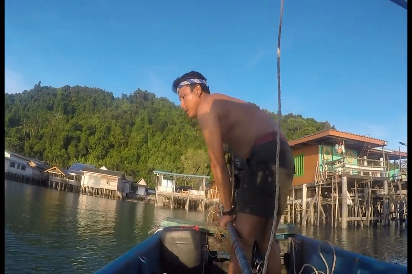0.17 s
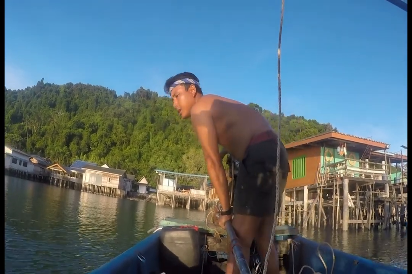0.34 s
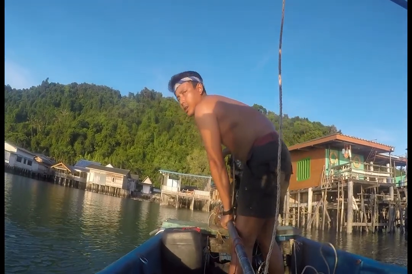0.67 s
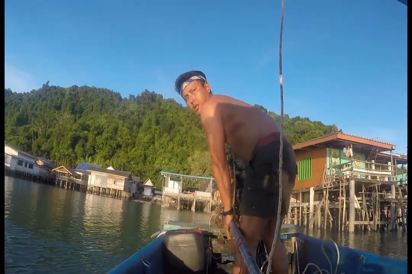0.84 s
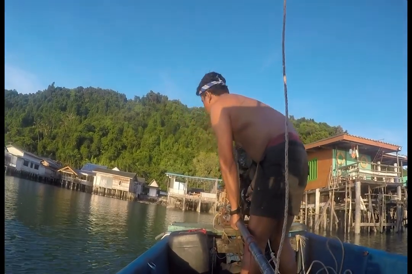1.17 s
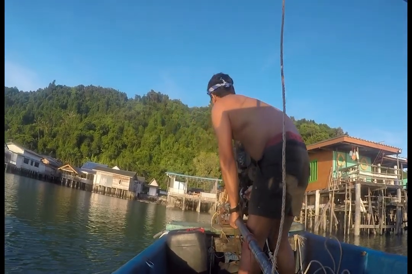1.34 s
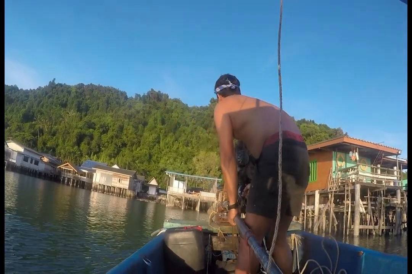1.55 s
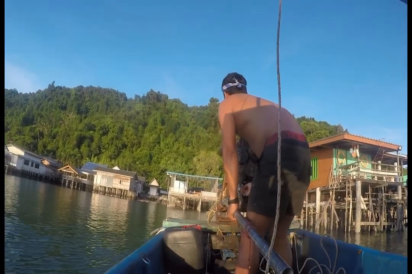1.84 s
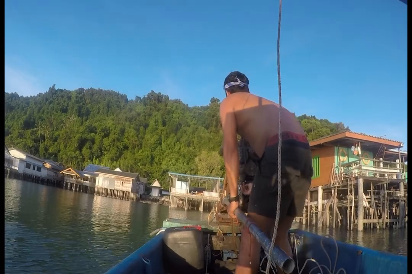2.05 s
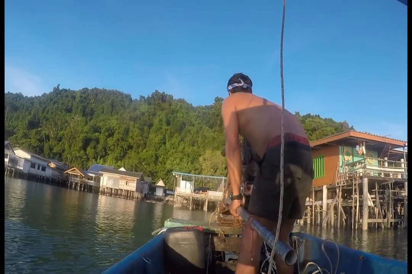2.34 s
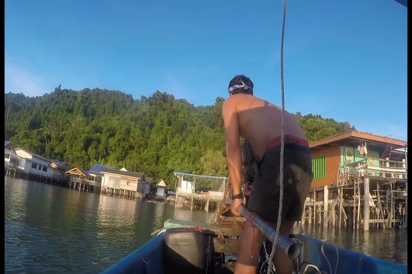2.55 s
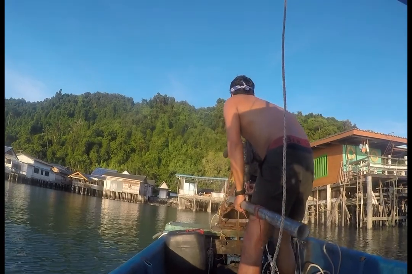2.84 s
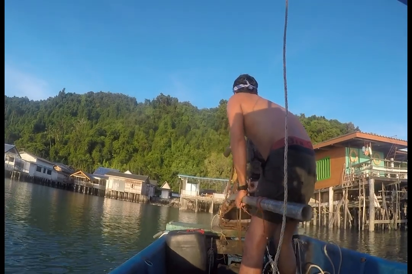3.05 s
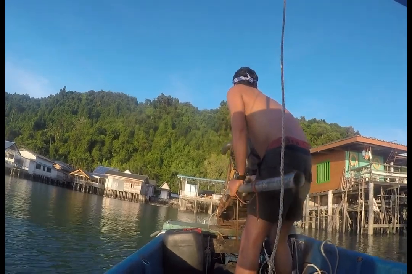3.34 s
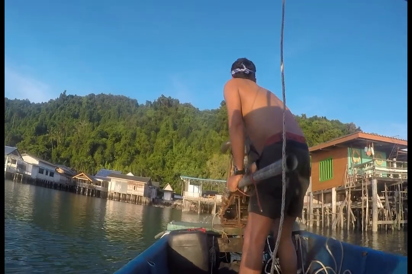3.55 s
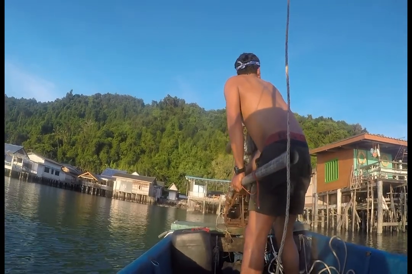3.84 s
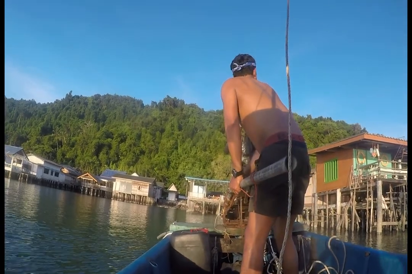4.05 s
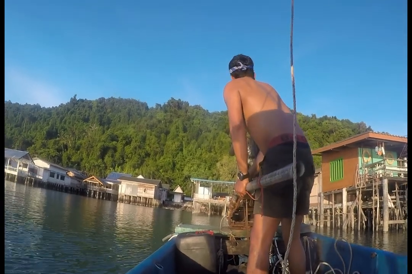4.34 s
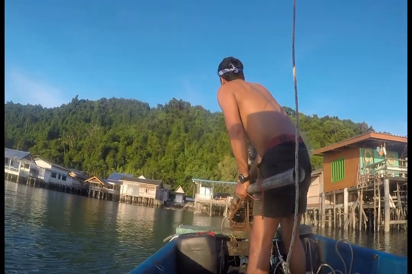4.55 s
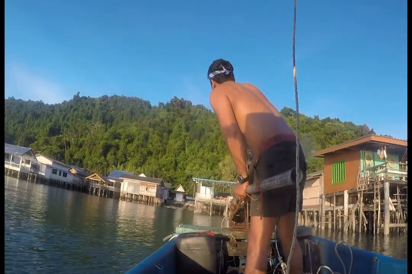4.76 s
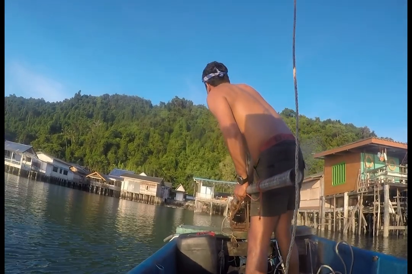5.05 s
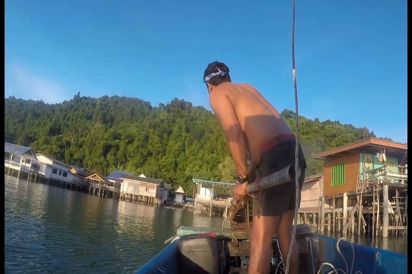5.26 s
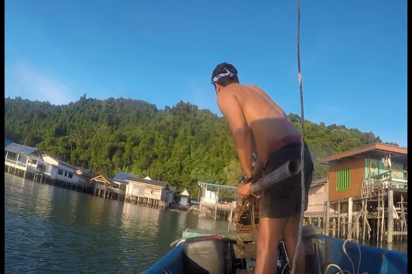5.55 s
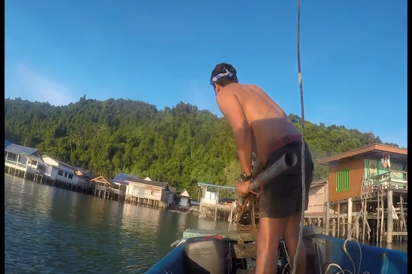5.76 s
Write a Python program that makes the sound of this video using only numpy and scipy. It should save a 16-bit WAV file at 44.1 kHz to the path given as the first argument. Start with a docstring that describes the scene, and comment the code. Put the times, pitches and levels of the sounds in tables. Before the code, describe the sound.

Close, dry sound aboard a small wooden boat in the open air. For the first 1.4 seconds someone shifts their feet: a run of dull, low thuds on the planks with short grainy scuffs and a couple of small clacks, over very faint air hiss. It goes almost quiet until 2.0, when a sharp clack and heavy thump land together and the starter engages. Its gritty gear whine strains in about six surges, each sagging in pitch, getting closer together, with another low thump near 2.4. Around 3.0 to 3.2 the engine catches in a crackle of hard knocks and a deep jolt. It drops into a lumpy, clattering idle, with exhaust puffs, ticks and loose metallic clacks, strongest around 3.5. From about 4 seconds it speeds up, roughly doubling its pace by 5.9, growing louder and brighter with a rising boom and fan hiss. A solid thud falls near 5.3.

```python
"""Aboard a longtail boat on calm water: feet thud and scuff on the wooden hull, sharp clacks sound. The
starter, a whine in gear noise, labours through six compressions; shaped noise bursts are the catch. The engine
settles to a clattering idle that speeds up and grows louder: noise pulsed at each firing, exhaust puffs, ticks
and a boom. Low noise is the hull's rumble, hiss the open air."""
import sys
import numpy as np
from scipy import signal
from scipy.fft import rfft, irfft
from scipy.io import wavfile
from scipy.ndimage import uniform_filter1d

SR = 44100
rng = np.random.default_rng(int(sys.argv[2]) if len(sys.argv) > 2 else 0)


def bounce(signal):
    """Save signal as a 16-bit WAV file at the path given by the first command-line argument."""
    frames = np.transpose(np.atleast_2d(signal))
    limited = np.clip(frames, -1, 1)
    pcm = np.round(limited * 32767).astype(np.int16)
    wavfile.write(sys.argv[1], SR, pcm)


N = 260322
TIME, FREQS = np.arange(N) / SR, np.fft.rfftfreq(N, 1 / SR)
EDGE_HZ = 15350

# Spectra below: (frequency [Hz], relative density [dB]).
# open air
AIR_SPECTRUM = [(35, -25), (60, -1), (246, -7), (390, -11), (727, -12.5), (1420, -14), (2200, -14),
                (2530, -17), (2710, -8), (3190, -14.5), (3580, -15), (3840, -15), (4310, -17.5),
                (6530, -22.5), (15000, -30.5)]
AIR_DB = -59.5
# hull rumble
RUMBLE_SPECTRUM = [(12, 6.5), (27, -1), (43, 1.5), (55, -4.5), (90, -17.5), (130, -16.5), (180, -33.5)]
# hull rumble: at rest, under starter load, at idle (less as the engine speeds up)
CALM_DB, CRANK_SHAKE_DB, IDLE_SHAKE_DB, SHAKE_DB_PER_OCTAVE = -53, -28, -21, -5.5
FOOTWORK_DB, FOOTWORK_END_S = -44.5, 1.4  # the boat sways while someone shifts about
JOLT_S, JOLT_DB = 3.1, -18.5  # the kick as the engine catches
THUD_ROCK_DB, ROCK_RISE_S, ROCK_DECAY_S = -11.5, 0.018, 0.18  # rocking, relative to each blow

# scuffs and scrapes: (middle [s], nominal length [s], level [dB], tilt [dB per octave])
SCUFFS = [(0.1, 0.032, -57, 6), (0.358, 0.12, -51, 4), (0.484, 0.038, -49.5, 9), (0.642, 0.052, -52, 1),
          (0.839, 0.045, -49, 1), (0.934, 0.029, -51, 1), (1.255, 0.11, -52.5, 4), (2.086, 0.026, -33.5, 8)]
# rubbing on the hull
SCUFF_SPECTRUM = [(200, 6), (600, 14), (1200, 10.5), (2200, 4.5), (3000, 9), (4500, -6), (7000, -14),
                  (10000, -34), (15000, -37)]

# dull blows on the hull:
# (time [s], level [dB], nominal boom frequency [Hz], t60 [s], slap relative to boom [dB])
THUDS = [(0.162, -38.5, 93, 0.3, -3.5), (0.207, -30.5, 108.6, 0.14, -9), (0.354, -28.5, 42.9, 0.38, -24.5),
         (0.548, -49, 162, 1, -18.5), (.632, -28, 43.3, 0.19, -8), (.764, -26, 89, 0.021, -15.5),
         (.826, -25.5, 47.7, 0.092, -27.5), (0.872, -21, 92, 0.071, -10), (.967, -28, 81, 0.034, -11.5),
         (1.028, -28.5, 88, 0.16, -9), (1.092, -35.5, 108, 0.24, -10), (1.166, -38, 112, 0.14, -28),
         (1.313, -26.5, 57, 0.06, -23), (2.003, -31, 84.4, 0.57, -14), (2.069, -14.5, 85.5, 0.076, -13),
         (2.147, -19, 53.6, 0.11, -12), (2.376, -17, 92, 0.093, -32), (5.26, -13.5, 62.7, 0.15, -17)]
# plank modes: (frequency [Hz], relative level [dB], t60 [s])
SLAP_MODES = [(192, 4, 0.017), (364, 1, 0.023), (487, -4, 0.029), (656, -3.5, 0.029), (1040, -4, 0.012)]

# sharp clacks: (time [s], peak [dB], brightness [dB per octave])
CLACKS = [(.204, -21.5, -4), (.871, -23, 10), (2.0597, -7.5, 1), (3.012, -17, -2), (3.4802, -10, 8.5),
          (3.614, -22.5, 9), (3.688, -30, -6), (3.762, -25, -5), (3.885, -20.5, -4), (3.958, -19, -1),
          (4.32, -15.5, -2), (4.62, -18.5, -2), (5.325, -18, -3.5)]
# its modes: (nominal frequency [Hz], relative level [dB], t60 [s])
CLACK_MODES = [(464, -19, 0.048), (632, -12.5, 0.025), (1120, 11.5, 0.006), (1693, -6, 0.023),
               (2530, 4, 0.006), (3750, -13, 0.0077), (5230, -22.5, 0.0052)]

# compressions loading the starter: (start [s], length [s], gear noise [dB], share of speed lost [1])
COMPRESSIONS = [(2.078, .155, -41, 0.34), (2.333, 0.12, -36, 0.42), (2.577, 0.068, -35, .42),
                (2.769, 0.097, -35.5, 0.48), (2.953, .09, -38, .36), (3.082, 0.12, -34.5, 0.06)]
LOAD_RISE_S, LOAD_RELEASE_S, RECOVER_S = 0.021, 0.038, .06
ENGAGE_S, RELEASE_S, COAST_DB = 2.07, 3.3, -59  # pinion in mesh between; gear noise without load
MESH_HZ, SPIN_UP_SHARE, SPIN_UP_S = 1694, .48, .14  # free tooth rate, share missing at first, time constant
# starter gears
GEARS_SPECTRUM = [(250, -31), (650, -15), (950, -11), (1250, -12), (1450, -19), (1700, -4), (2000, -13),
                  (2900, 5), (3500, -3.5), (5600, -10.5), (6400, -17.5), (9000, -28), (13000, -30),
                  (15000, -46)]
# starter motor hiss
SPIN_SPECTRUM = [(300, -7.5), (1000, -4.5), (2000, -16), (3000, 4), (5400, -5), (7500, -12.5), (8800, -27),
                 (10300, -21), (15000, -33)]

# the engine lurches on its mounts under compressions: (time [s], level [dB])
LURCHES = [(2.142, -26.5), (2.161, -33.5), (2.226, -34), (2.372, -29), (2.401, -32), (3.03, -31.5)]
# clunking mounts
MOUNTS_SPECTRUM = [(110, 7), (170, 10.5), (260, -18.5), (480, 0), (850, 0.5), (1300, -10), (1800, -14.5),
                   (2600, -22)]
LURCH_RISE_S, LURCH_DECAY_S = 0.0016, 0.013

# engine speed: (time [s], firing rate [1/s])
SPEED = [(3.1, 20.88), (3.4, 18.95), (3.55, 22.15), (3.8, 18.6), (4.05, 21.86), (4.25, 24.68),
         (4.45, 27.86), (4.6, 26.6), (4.8, 30.32), (5.1, 31.99), (5.35, 34.17), (5.6, 34.66), (5.9, 39.98)]
FIRST_FIRING_S, IDLE_FIRINGS_PER_S = 3.121, 20
# strength of each cylinder in firing order: (relative level [dB])
CYLINDERS_DB = [-0.9, -1.3, -2.5, 1.1, -2.5, -4]
# engine block
BLOCK_SPECTRUM = [(150, -30.5), (250, -7.5), (500, -5.5), (800, -6), (1200, -6), (1480, -14.5),
                  (1800, -6.5), (2100, -9.5), (2500, -7.5), (3100, -6.5), (4200, -13.5), (5500, -16),
                  (8500, -33.5), (15000, -34.5)]
# ringing block and covers: (frequency [Hz], width [Hz], level above the spectrum [dB])
BLOCK_MODES = [(334.4, 25, 12), (904, 72, 9.5), (1085, 33, 14), (1273, 84, 12), (1697, 210, 12),
               (2765, 128, 18), (2940, 68, 14), (3580, 126, 12.5), (3865, 115, 12.5), (4700, 30, 4.5),
               (6060, 26, 10), (6820, 72, 9), (7670, 760, 13), (10170, 890, 11.5)]
# loose parts chattering at each firing:
# (frequency [Hz], width [Hz], relative level [dB], place in firing cycle [cycles])
RATTLES = [(1176, 440, -15.5, 0.153), (1737, 380, -14.5, -0.019), (2616, 460, -10, -0.12),
           (2920, 490, -10.5, -0.24), (5120, 1330, -20.5, -0.38)]
# engine tick
TICK_SPECTRUM = [(2000, -20), (5000, 12), (7500, 6.5), (9000, 1), (10300, 3.5), (12000, 5), (13300, 3),
                 (15000, -15)]
# exhaust; also the starter motor's low noise
EXHAUST_SPECTRUM = [(40, -25.5), (70, 3), (100, -5), (140, 1.5), (180, -4.5), (220, -15), (300, -29.5),
                    (600, -47.5)]
# levels at the idle rate, and gain per doubling of speed
CLATTER_DB, CLATTER_DB_PER_OCTAVE = -41, 6
EXHAUST_DB, EXHAUST_DB_PER_OCTAVE = -36, 0
FLARE_DB, FLARE_END_S, FLARE_FADE_S = 5, 3.21, .06  # exhaust is louder while the engine catches

# firings that knock harder than the rest: (time [s], level [dB])
HARD_FIRINGS = [(2.965, -26), (3.033, -30), (3.058, -28.5), (3.108, -24.5), (3.124, -30), (3.143, -23.5),
                (3.165, -23), (3.207, -21), (3.364, -28.5), (3.414, -32.5), (3.554, -35.5), (4.184, -29),
                (4.383, -34), (4.942, -27)]
# hard knock
KNOCK_SPECTRUM = [(200, -5.5), (550, -1.5), (1150, -1.5), (1500, -4.5), (1800, 2.5), (2100, -8.5),
                  (2600, 5.5), (3150, -1), (3800, -2.5), (5500, -8.5), (8500, -22.5), (15000, -23)]
KNOCK_RISE_S, KNOCK_DECAY_S = 0.0017, 0.015

# cooling fan
FAN_SPECTRUM = [(800, -6), (2500, 0.5), (4000, 1), (5700, 2), (7300, -12), (9000, -18.5), (15000, -17)]


def amp(db):
    """Decibels to gain."""
    return 10 ** (np.asarray(db) / 20)


def unit(x):
    """Scales to rms 1."""
    return x / np.sqrt(np.mean(x ** 2) + 1e-20)


def curve(rows):
    """Points (time [s], value) joined by straight lines."""
    rows = np.asarray(rows)
    return np.interp(TIME, rows[:, 0], rows[:, 1])


def add(mix, s, sound):
    """Mixes a sound in at a time."""
    part = mix[max(round(s * SR), 0):][:len(sound)]
    part += sound[:len(part)]


def colour(x, points, modes=()):
    """Causal (minimum-phase) filter: a smooth spectrum with steep ends, resonances standing on it."""
    hz, db = np.transpose(points)
    octave = np.log2(FREQS + 1)
    level = np.interp(octave, np.log2(hz + 1), db)
    level -= 18 * np.maximum(np.log2(hz[0] + 1) - octave, 0)
    level -= 18 * np.maximum(octave - np.log2(hz[-1]), 0)
    power = 1 + sum((amp(d) ** 2 - 1) / (1 + (2 * (FREQS - f) / w) ** 2) ** 2 for f, w, d in modes)
    log_gain = np.log(np.maximum(amp(level) * np.sqrt(np.abs(power)), 1e-5))
    fold = np.r_[1, np.full(N // 2 - 1, 2), np.zeros(N - N // 2)]
    causal = irfft(log_gain, N) * fold
    return irfft(rfft(x) * np.exp(rfft(causal)), N)


def noise():
    """White noise of rms 1."""
    return rng.standard_normal(N)


def drift(hz):
    """Slow chance of rms 1, up to the given rate."""
    return unit(irfft(rfft(noise()) / (1 + (FREQS / hz) ** 4), N))


def bursts(rows, rise_s, decay_s):
    """Envelope of blows (time [s], level [dB], ...) sharing one rise and one decay."""
    out = np.zeros(N)
    for s, db, *_ in rows:
        age_s = np.maximum(TIME - s, 0)
        out += amp(db) * np.exp(-age_s / decay_s) * (1 - np.exp(-age_s / rise_s))
    return out


def blows(cycles, place, rate, decay_s, cylinders_db, spread_db, rise_s=0.0011):
    """Envelope of one blow a cycle at the given place in the cycle, each of its own strength."""
    number = np.floor(cycles - place).astype(int)
    age_s = (cycles - place - number) / rate
    chance_db = spread_db * rng.standard_normal(size=256)[number % 256]
    db = np.asarray(cylinders_db)[number % len(cylinders_db)] + chance_db
    return amp(db) * np.exp(-age_s / decay_s) * (1 - np.exp(-age_s / rise_s))


def with_speed(idle_db, db_per_octave):
    """Gain that follows the engine's speed."""
    return amp(idle_db + db_per_octave * np.log2(curve(SPEED) / IDLE_FIRINGS_PER_S))


def load(start_s, length_s):
    """One compression bears on the starter: it rises, holds and lets go."""
    release = np.exp(-np.maximum(TIME - start_s - length_s, 0) / LOAD_RELEASE_S)
    return np.clip((TIME - start_s) / LOAD_RISE_S, 0, 1) * release


def surroundings():
    """Faint open-air hiss, and the deep rumble of the moving hull."""
    air = amp(AIR_DB) * unit(colour(noise(), AIR_SPECTRUM, [(3100, 220, 4.6)]))
    return air + shake() * unit(colour(noise(), RUMBLE_SPECTRUM))


def shake():
    """Hull motion: footwork, blows, compressions, the catch and the running engine add their power."""
    footwork = amp(FOOTWORK_DB) * np.clip((FOOTWORK_END_S - TIME) / ROCK_DECAY_S, 0, 1)
    knocked = [amp(THUD_ROCK_DB) * bursts([row], ROCK_RISE_S, ROCK_DECAY_S) for row in THUDS]
    cranking = amp(CRANK_SHAKE_DB) * sum(load(start, length) for start, length, *_ in COMPRESSIONS)
    jolt = bursts([(JOLT_S, JOLT_DB)], ROCK_RISE_S, ROCK_DECAY_S)
    onset = np.clip((TIME - JOLT_S) / ROCK_RISE_S, 0, 1)
    running = with_speed(IDLE_SHAKE_DB, SHAKE_DB_PER_OCTAVE) * onset
    parts = [amp(CALM_DB), footwork, cranking, jolt, running, *knocked]
    return np.sqrt(sum(part ** 2 for part in parts))


def scuffs():
    """Short grainy rubs that swell and fade."""
    out = np.zeros(N)
    rub = rfft(colour(noise() * amp(1.6 * drift(600)), SCUFF_SPECTRUM))
    for s, length, db, tilt_db in SCUFFS:
        # the whole swell spans 1.42 nominal lengths
        swell = np.cos(np.pi * np.clip((TIME - s) / (length * 1.42), -.5, .5)) ** 2
        tilted = unit(irfft(rub * amp(tilt_db * np.log2(FREQS + 1)), N))
        out += amp(db) * swell * tilted
    return out


def thuds():
    """Blows on the planks: a low boom that starts high and sinks, and a brief woody slap."""
    out, t = np.zeros(N), np.arange(SR // 3) / SR
    attack = 1 - np.exp(-t / .0012)
    slap = sum(amp(db - 60 * t / t60) * np.sin(2 * np.pi * hz * t) for hz, db, t60 in SLAP_MODES)
    for s, db, hz, t60, slap_db in THUDS:
        # glides from 1.32 to 0.85 times nominal
        turns = np.cumsum(hz * (.85 + 0.47 * np.exp(-t / 0.0202))) / SR
        boom = amp(-60 * t / t60) * np.sin(2 * np.pi * turns)
        add(out, s, amp(db) * attack * (boom + amp(slap_db) * slap))
    return out


def clacks():
    """A sharp clack: a few short modes, the upper ones stronger on a sharp blow."""
    out, t = np.zeros(N), np.arange(SR // 16) / SR
    detunes = rng.standard_normal((len(CLACKS), len(CLACK_MODES)))
    for (s, db, bright_db), detune in zip(CLACKS, detunes):
        ring = np.zeros(len(t))
        for k, ((hz, mode_db, t60), e) in enumerate(zip(CLACK_MODES, detune)):
            decay = amp(mode_db + bright_db * np.log2(hz / 1200) - 60 * t / t60)
            ring += (-1) ** k * decay * np.sin(2 * np.pi * hz * (1 + .03 * e) * t)
        ring *= 1 - np.exp(-t / 0.00062)
        add(out, s, amp(db) * ring / np.abs(ring).max())
    return out


def mesh_hz():
    """The starter spins up; each compression drags it down ever harder, then it recovers."""
    hz = MESH_HZ * (1 - SPIN_UP_SHARE * np.exp(-np.maximum(TIME - ENGAGE_S, 0) / SPIN_UP_S))
    for start, length, _, sag in COMPRESSIONS:
        recovery = np.exp(-np.maximum(TIME - start - length, 0) / RECOVER_S)
        drag = np.clip((TIME - start) / length, 0, 1) ** 2 * recovery
        hz = hz * (1 - sag * drag)
    return hz


def starter():
    """Pinion teeth grind on the flywheel: broken whine in gear noise via the housing, over motor hiss."""
    turns = np.cumsum(mesh_hz() * (1 + .026 * drift(150))) / SR
    # uneven teeth: side partials, each fluttering; (multiple of mesh rate, dB)
    partials = [(1, 0), (.75, -5), (1.25, -7), (2, -12), (3, -13)]
    whine = unit(sum(amp(db + 3 * drift(60)) * np.sin(2 * np.pi * k * turns) for k, db in partials))
    grind = unit(noise() * amp(2 * drift(150)))
    # (Hz, width Hz, dB above the spectrum)
    housing = [(924, 105, 11.8), (1257, 82, 12.2), (1750, 98, 3.3), (2930, 105, 6.2)]
    gears = unit(colour(grind + .45 * whine, GEARS_SPECTRUM, housing))
    engaged = (TIME > ENGAGE_S) & (TIME < RELEASE_S)
    strain = amp(COAST_DB) + sum(amp(db) * load(start, length) for start, length, db, _ in COMPRESSIONS)
    powered = np.interp(TIME, [2.07, 2.1, 3.1, 3.25], [0, 1, 1, 0])
    motor = amp(-46.5) * unit(colour(noise(), SPIN_SPECTRUM))
    motor += amp(-50.5) * unit(colour(noise(), EXHAUST_SPECTRUM))
    return gears * strain * engaged + motor * powered


def lurches():
    """Rattling clunks from the mounts: short bursts of shaped noise."""
    return bursts(LURCHES, LURCH_RISE_S, LURCH_DECAY_S) * unit(colour(noise(), MOUNTS_SPECTRUM))


def block_and_chatter(firings, rate):
    """Combustion and piston slap drive the block; loose parts chatter at each firing."""
    combustion = blows(firings, -.22, rate, .009, CYLINDERS_DB, 2, rise_s=.003)
    piston_slap = blows(firings, .09, rate, .0012, CYLINDERS_DB, 3.5, rise_s=.0004)
    drive = unit(.66 + 1.1 * combustion + .9 * piston_slap) * unit(noise() * amp(2.2 * drift(500)))
    # the block rings on more as the blows come faster
    ringing = np.clip((rate - 13) / 20, 0, 1)
    block = ringing * unit(colour(drive, BLOCK_SPECTRUM, BLOCK_MODES))
    block += (1 - ringing) * unit(colour(drive, BLOCK_SPECTRUM))
    chatter = np.zeros(N)
    for hz, width, db, place in RATTLES:
        ring = unit(irfft(rfft(noise()) / (1 + (2 * (FREQS - hz) / width) ** 4), N))
        hits = blows(firings, place, rate, .007, CYLINDERS_DB, 4, rise_s=.0015)
        chatter += amp(db) * unit(ring * hits)
    return with_speed(CLATTER_DB, CLATTER_DB_PER_OCTAVE) * (block + chatter)


def ticking(firings, rate):
    """A tick twice a crank turn (every 1.5 firings): pulsed noise and a wavering high tone."""
    tick = blows(firings * 2 / 3, .03, rate * 2 / 3, .012, [0, 0], 2.2, rise_s=.005)
    ticks = amp(-57.0) * unit(colour(noise() * (tick + 0.25), TICK_SPECTRUM))
    return ticks + amp(-66) * unit(tick * np.sin(2 * np.pi * 12555 * TIME + 1.8 * drift(70)))


def exhaust_gas(firings, rate):
    """A pressure pulse a firing with turbulent gas around it."""
    puffs = unit(blows(firings, -.1, rate, .004, CYLINDERS_DB, 1.5))
    gas = unit(colour(noise() * (1 + .3 * puffs), EXHAUST_SPECTRUM))
    gas += .6 * unit(colour(puffs, EXHAUST_SPECTRUM))
    flare = amp(FLARE_DB * np.exp(-np.maximum(TIME - FLARE_END_S, 0) / FLARE_FADE_S))
    return with_speed(EXHAUST_DB, EXHAUST_DB_PER_OCTAVE) * flare * unit(gas)


def pipe_boom(firings, rate):
    """The fourth multiple of the firing rate booms as it climbs through the pipe's resonance."""
    smooth = uniform_filter1d(firings, size=12001, mode="nearest")
    level = amp(-32 + .7 * drift(8)) / np.hypot(1, (4 * rate - 146) / 17)
    return level * np.sin(2 * np.pi * 4 * smooth + .2 * drift(6))


def engine():
    """Firings drive the exhaust, then block, ticks, pipe boom and a rocking tone at the firing rate."""
    rate = curve(SPEED)
    firings = np.cumsum(rate) / SR
    firings -= np.interp(FIRST_FIRING_S, TIME, firings)
    running = np.clip((TIME - 3.2) / 0.019, 0, 1)
    clatter = block_and_chatter(firings, rate)
    ticks = ticking(firings, rate)
    exhaust = exhaust_gas(firings, rate)
    boom = pipe_boom(firings, rate)
    rocking = amp(-32.5) * np.sin(2 * np.pi * firings + 1.85 * drift(1.7))
    return running * (clatter + ticks + boom + rocking) + exhaust * np.clip((TIME - 2.9) / 0.19, 0, 1)


def catch():
    """Firings on pooled fuel knock harder than the idle: coarse crackle, short metallic ring."""
    crackle = noise() * amp(3.5 * drift(700))
    knock = unit(colour(crackle, KNOCK_SPECTRUM, [(2980, 224, 11.1), (2700, 79, 3.7)]))
    return bursts(HARD_FIRINGS, KNOCK_RISE_S, KNOCK_DECAY_S) * knock


def fan():
    """The cooling fan's even hiss grows steeply with engine speed."""
    speed = curve(SPEED) / SPEED[-1][1]
    onset = np.clip((TIME - 3.1) / 0.15, 0, 1)
    return amp(-41.0) * speed ** 4.8 * onset * unit(colour(noise(), FAN_SPECTRUM))


def scene():
    """Everything aboard, close by and without echo."""
    before = surroundings() + scuffs() + thuds() + clacks()
    cranking = starter() + lurches()
    return (before + cranking + engine() + catch() + fan())[None]


def record(dry):
    """Linear-phase low-pass at EDGE_HZ."""
    lowpass = signal.firwin(511, EDGE_HZ, window=("kaiser", 9), fs=SR)
    return signal.oaconvolve(dry, lowpass[None], "same")


dry = scene()
out = record(dry)
bounce(out)
```